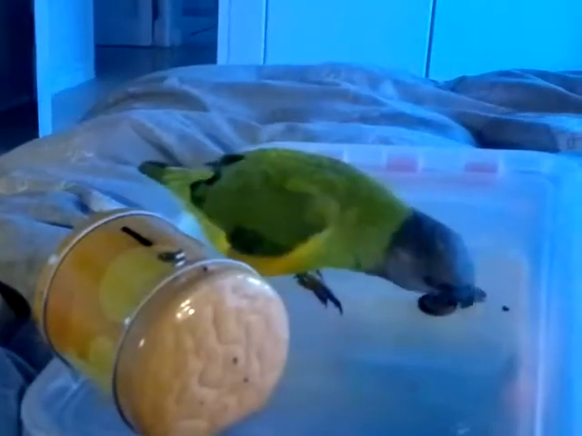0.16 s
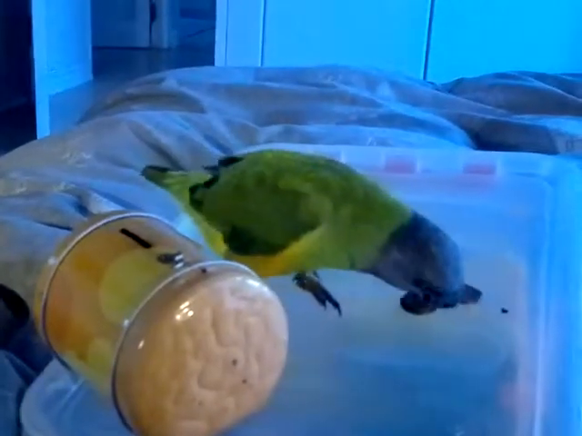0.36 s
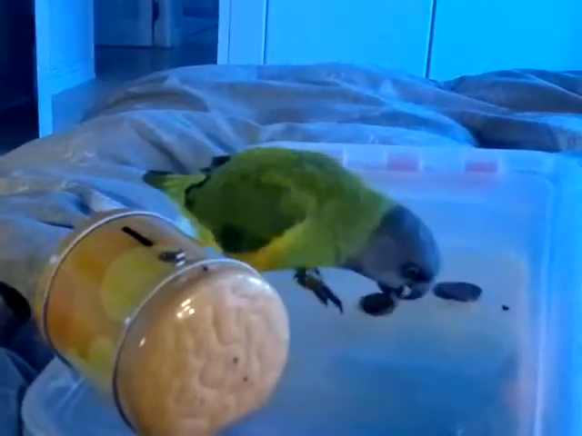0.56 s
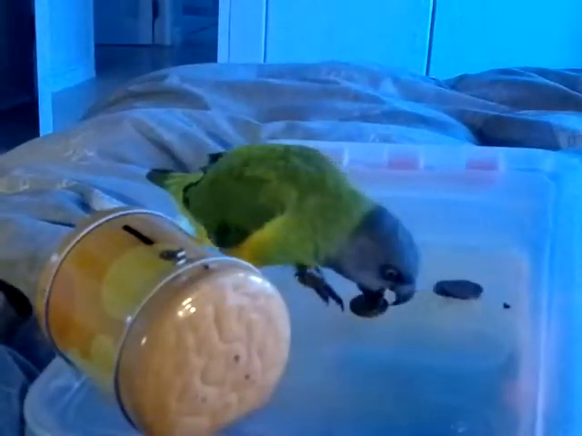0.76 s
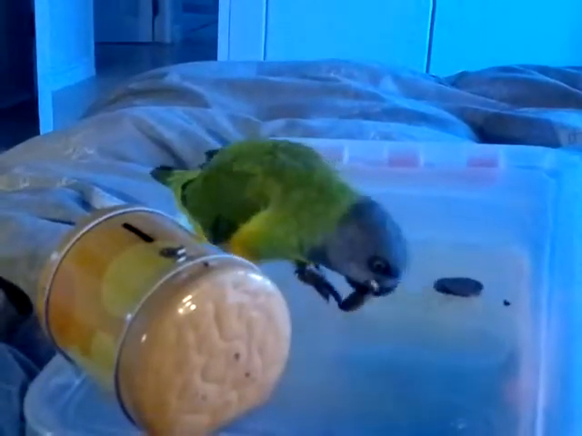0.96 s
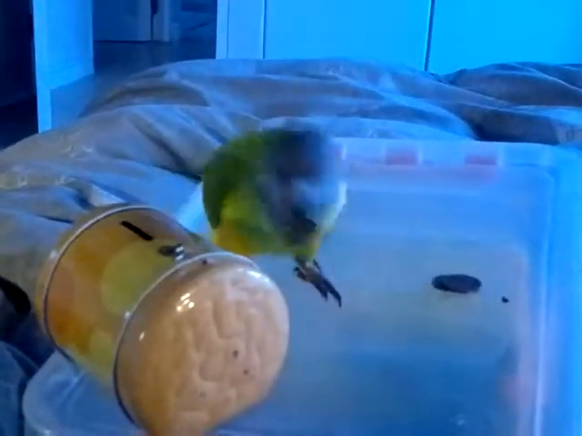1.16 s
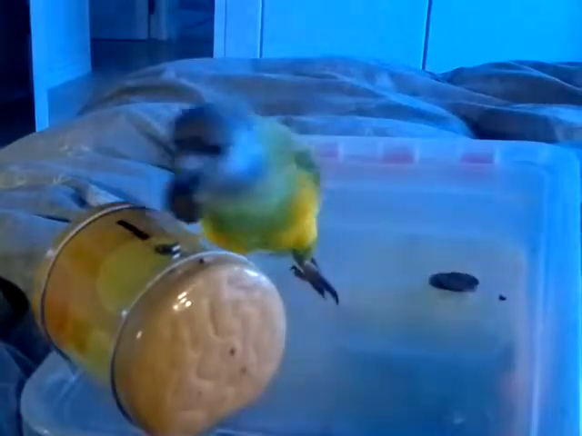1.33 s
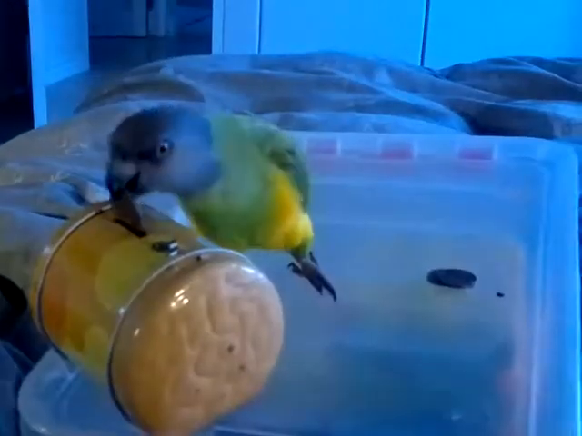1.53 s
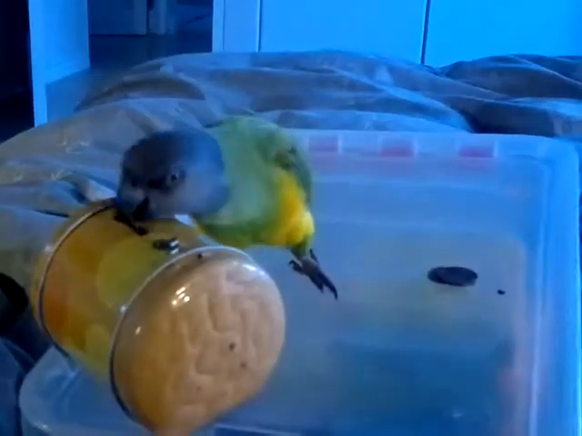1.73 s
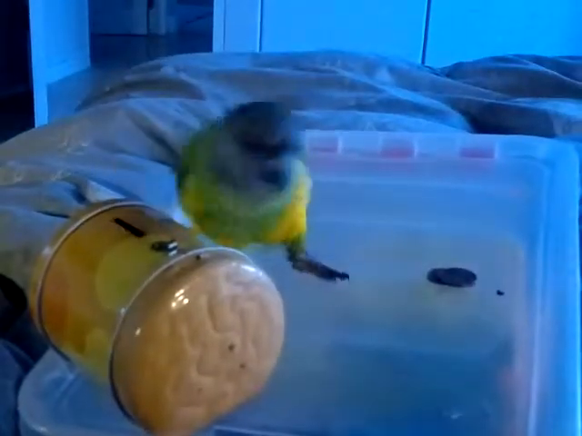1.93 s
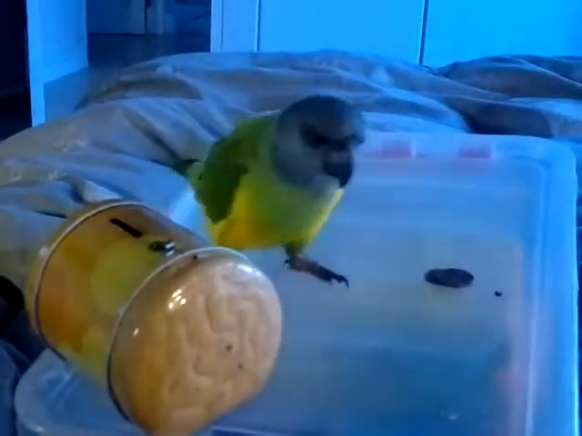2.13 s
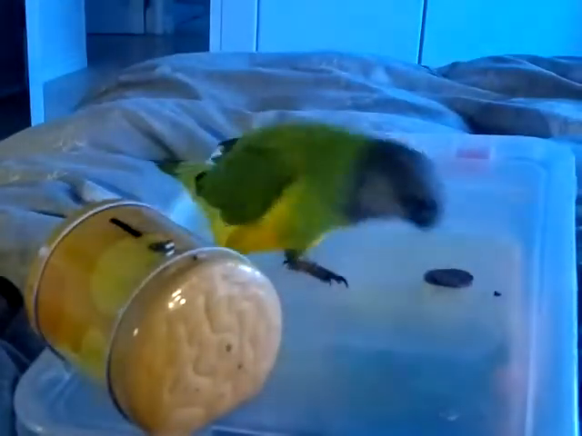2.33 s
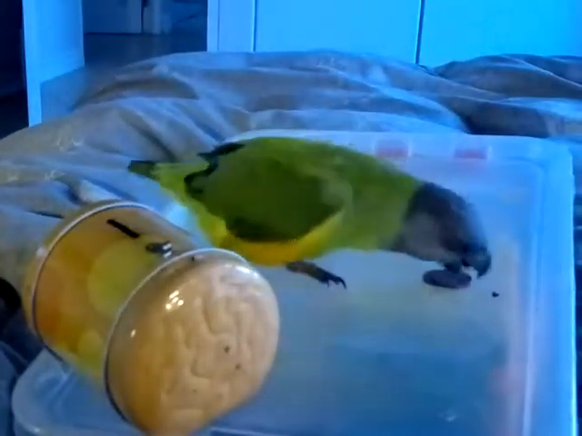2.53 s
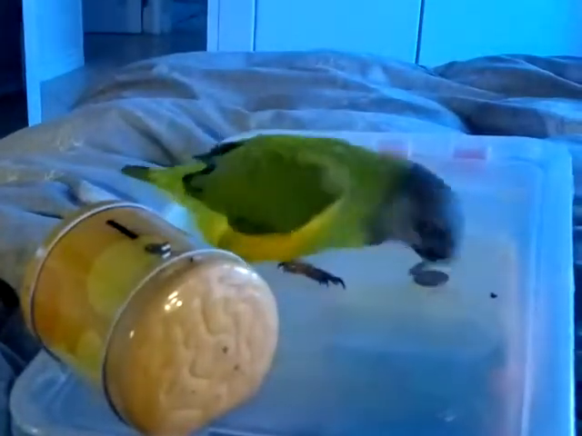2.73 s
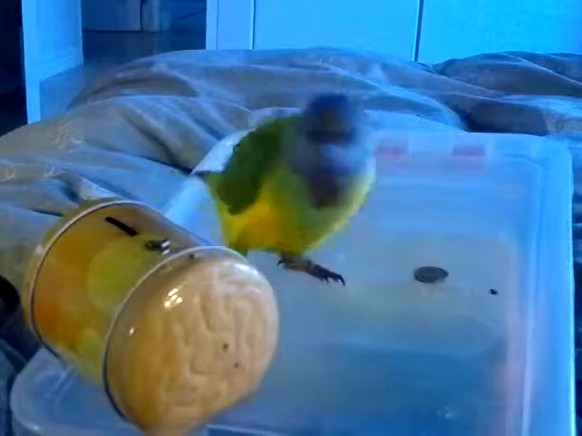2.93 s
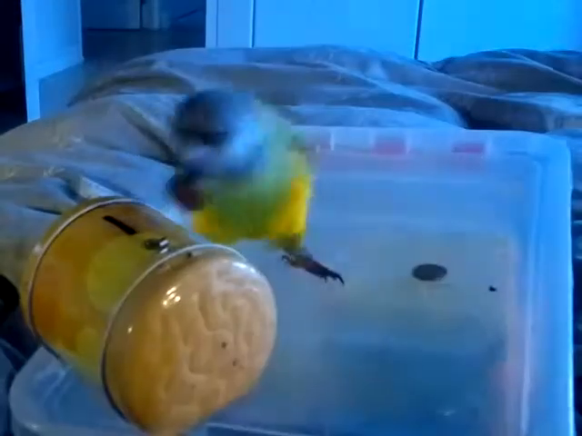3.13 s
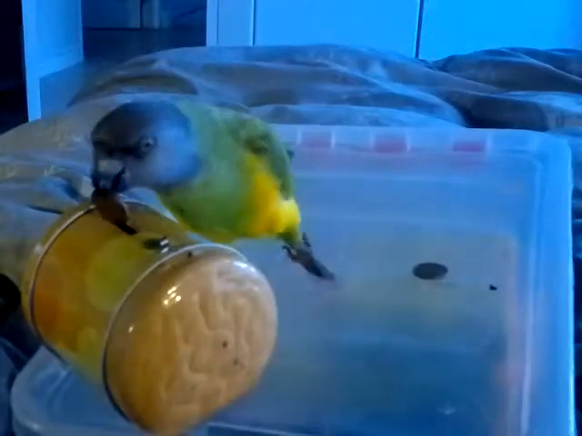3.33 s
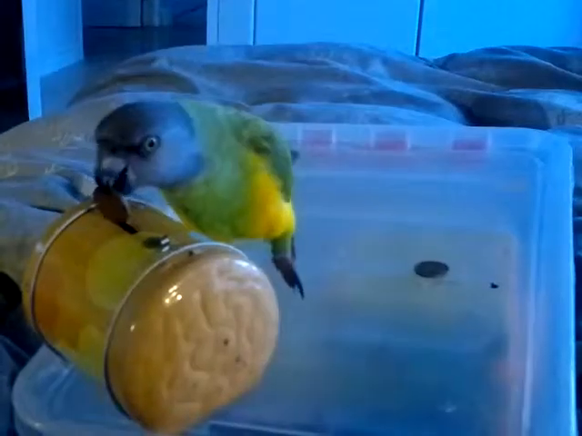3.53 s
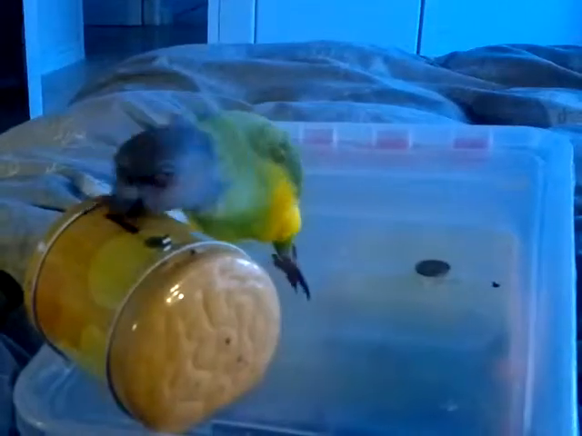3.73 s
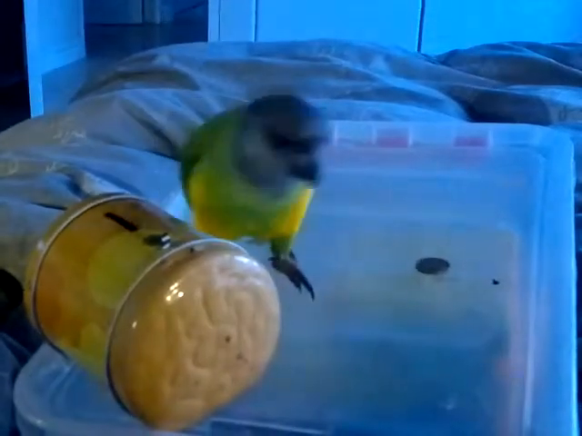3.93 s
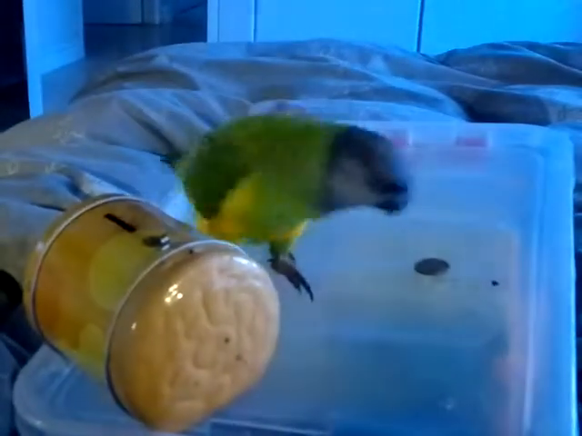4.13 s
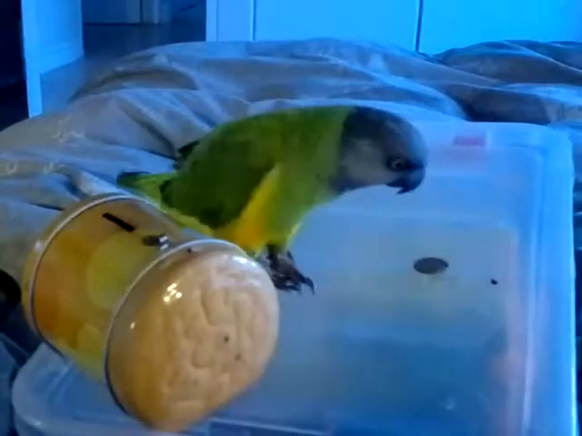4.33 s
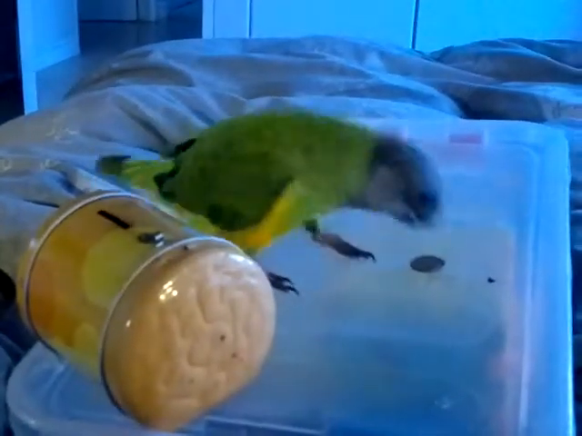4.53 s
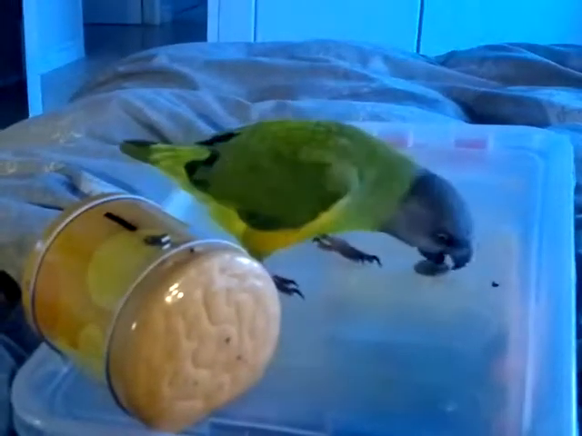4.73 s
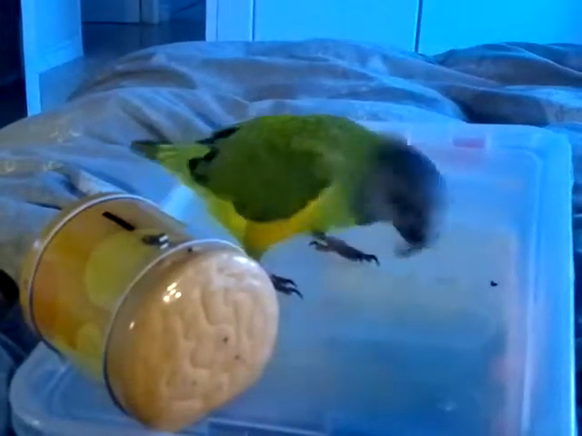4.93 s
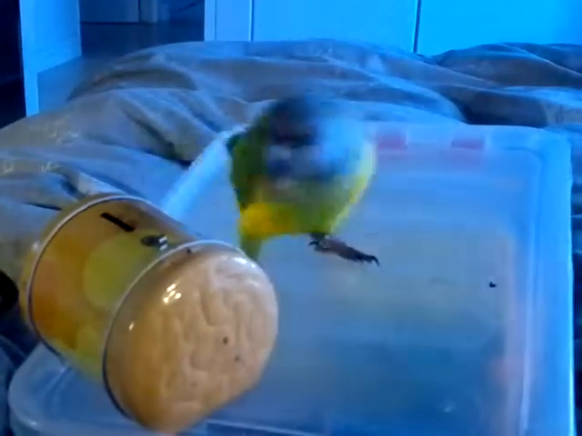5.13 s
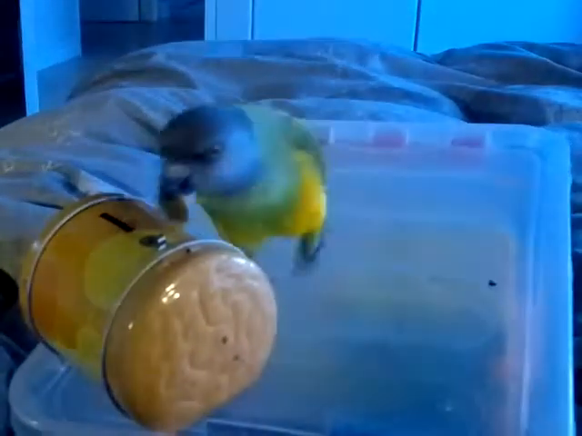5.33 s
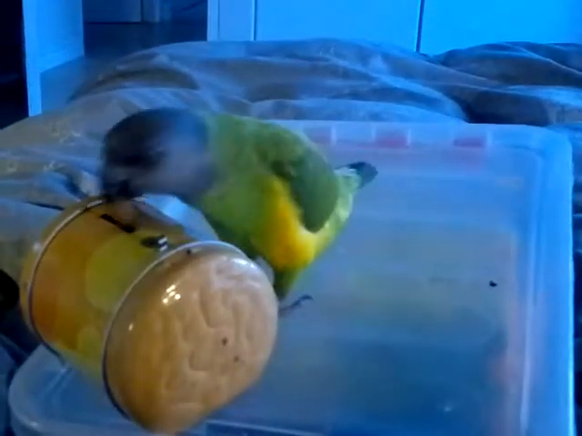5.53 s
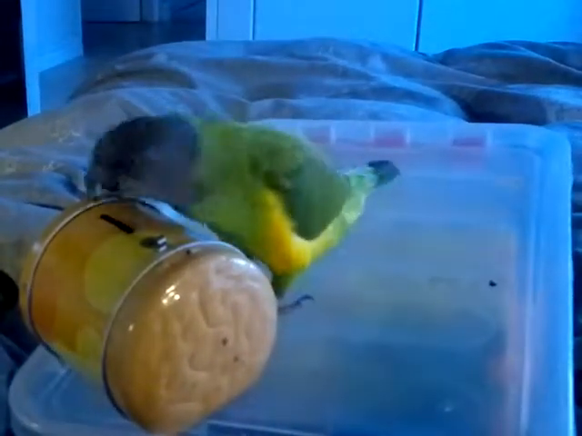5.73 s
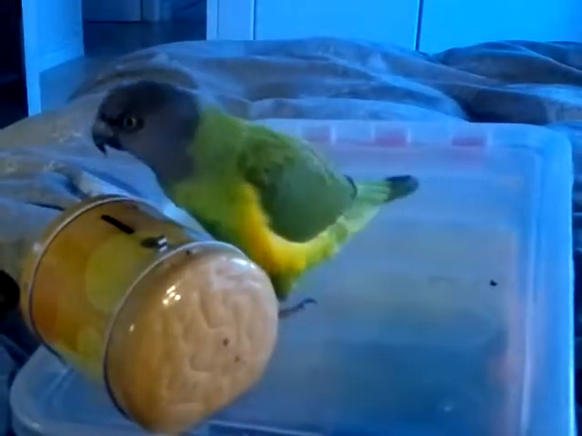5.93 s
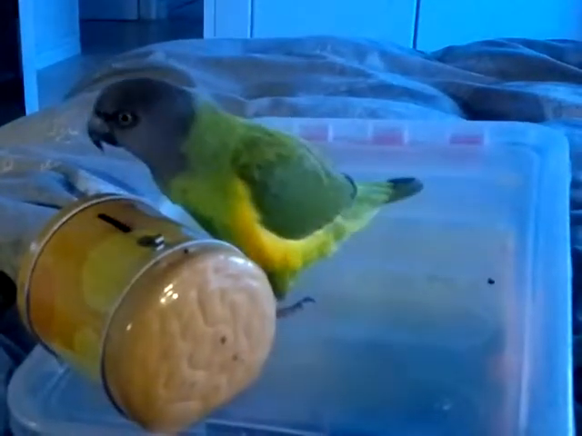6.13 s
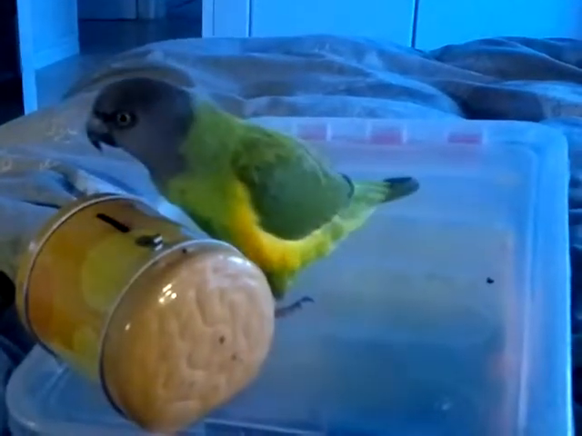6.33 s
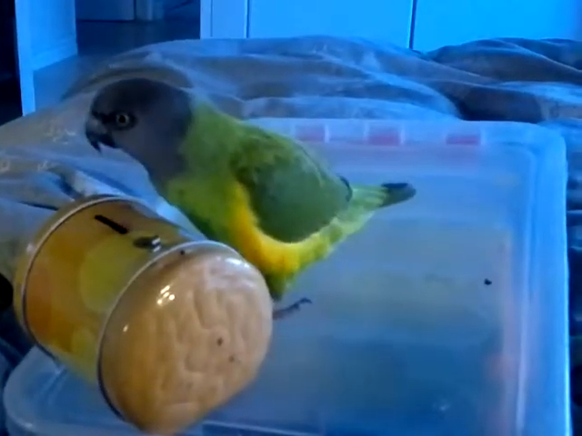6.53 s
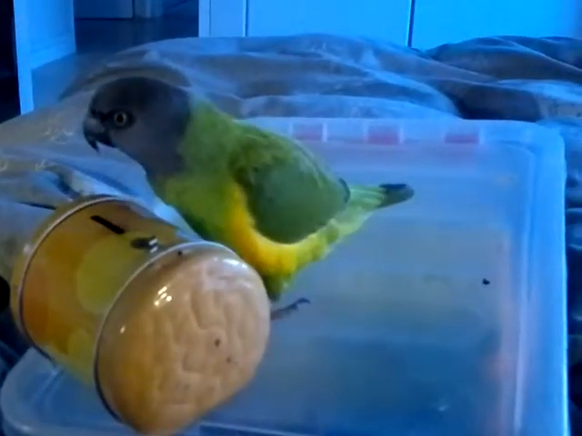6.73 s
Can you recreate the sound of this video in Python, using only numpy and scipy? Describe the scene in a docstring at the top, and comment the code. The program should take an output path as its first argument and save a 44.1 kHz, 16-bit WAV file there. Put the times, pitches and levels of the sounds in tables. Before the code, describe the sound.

Faint room hiss and an uneven low handling rumble, mostly on the left, run throughout. From 0.1 to 0.9 s a parrot's beak, claws and coins tick, thud and briefly slide on a plastic tub lid, strongest near 0.3 s. From 1.3 to 1.65 s a coin scrapes drily on a tin bank's slot; at 1.74 s it drops with a loud, bright clatter and hollow knocks, tumbling among coins until about 1.95 s. Lid taps return around 2.5-2.6 s. Scrapes at 3.1-3.3 and 3.55-3.65 s lead to a second, longer crash from 3.74 to 4.05 s. A soft lid tap comes at 4.65 s, small rubs at 4.75 and 5.35 s, and scrapes at 5.3-5.65 s. The third coin lands at 5.74 s, shorter, with a weaker topple at 5.93-6.02 s. Short, dense small-room reflections follow the hits. Only a tiny scrape near 6.16 s interrupts the closing hiss and rumble.

```python
"""Taps and slides on a plastic tub lid come first, over a faint uneven rumble: a parrot picks coins off the lid.
It posts three of them into a tin bank lying on its side: each scrapes in the slot, falls and tumbles among others.
Noise-like contact forces excite bodies made of a coloured crack and decaying modes; friction drives the slides.
A small furnished room adds dense reflections, and the hand-held camera rumbles, mostly on the left."""
import sys
import numpy as np
from scipy import signal
from scipy.fft import rfft, irfft, next_fast_len
from scipy.io import wavfile

SR = 44100
rng = np.random.default_rng(int(sys.argv[2]) if len(sys.argv) > 2 else 0)


def dump_mix(stems):
    """Bounce the given channels to the path in sys.argv[1] as a 16-bit WAV at rate SR."""
    frames = np.atleast_2d(stems).T  # one column per channel
    limited = np.clip(frames, -1, 1)  # hard clip at full scale
    pcm = np.round(limited * 32767).astype(np.int16)
    wavfile.write(sys.argv[1], SR, pcm)


N = 303408

# room noise spectrum, relative: (frequency [Hz], density [dB per Hz])
HISS_SPECTRUM = [(30, 5), (100, -2.5), (250, -3.5), (450, -16), (1000, -19), (2500, -18.5), (5000, -28.5),
                 (15000, -33)]
# handling rumble spectrum, relative: (frequency [Hz], density [dB per Hz])
RUMBLE_SPECTRUM = [(8, -14), (18, -4), (35, -2), (60, -9), (110, -19), (170, -31.5), (400, -43),
                   (1500, -69)]
# the hand shifts on the camera and the rumble swells: (time of crest [s], rise [dB])
HAND_SHIFTS = [(.15, 11), (0.429, 7), (.65, 8), (1.07, 10), (1.221, 7), (1.62, 9.5), (1.78, 6.5), (2.28, 9),
               (2.48, 6), (2.7, 3), (3.5, 2.5), (3.79, 4), (3.981, 5.5), (4.62, 8.5), (4.919, 8),
               (5.48, 12.5), (5.82, 8.5)]
# side relative to mid at the two microphone ports: (frequency [Hz], level [dB])
SIDE_TO_MID = [(100, -13.5), (850, -10.5), (1150, -7.5), (1500, 1.5), (1950, 6.5), (2600, 6), (3700, -1.5),
               (12000, 2.5)]
# left relative to right, for the tub: (frequency [Hz], level [dB])
TUB_LEFT_TO_RIGHT = [(100, 4), (400, 6.5), (1300, -1), (2400, 2), (4400, 16), (8100, -12), (15000, -13)]
# left relative to right, for the bank: (frequency [Hz], level [dB])
BANK_LEFT_TO_RIGHT = [(100, 3), (400, 1), (700, 2), (1300, -2), (2400, 2), (4400, 1), (8100, -11.5),
                      (15000, -18.5)]
# beak, claws and coins tap the tub lid: (time [s], tick level [dB], thud level [dB])
LID_TAPS = [(0.129, -42, -30.5), (0.202, -38.5, -43), (0.2919, -33, -39), (.306, -23.5, -28),
            (.437, -32.5, -33), (0.5, -37.5, -40.5), (0.627, -48.5, -35), (0.659, -49, -33.5),
            (.78, -49.5, -34), (0.882, -53, -47), (2.507, -40, -32.5), (2.529, -51, -31),
            (2.5588, -34, -44), (2.598, -27, -30), (2.626, -24, -46), (3.41, -54, -60.5), (4.478, -58, -81),
            (4.653, -37.5, -28.5), (4.67, -60, -31), (4.770, -52, -46)]
# coins and claws slide over the lid: (time [s], length [s], level [dB], brightness [dB per octave])
LID_SLIDES = [(.185, 0.047, -48, -5.5), (0.294, .038, -38, 11.5), (0.392, 0.053, -50.5, -9),
              (.435, 0.092, -39.5, -6), (0.752, 0.043, -52, -8), (2.513, 0.041, -46, 4.5),
              (2.593, 0.064, -42.5, 6), (4.747, 0.052, -48.5, -4.5), (5.353, 0.092, -42.5, 4)]
# resonances of the tub lid: (frequency [Hz], level [dB], t60 [s])
LID_MODES = [(132, 2.5, 0.025), (208, -1, 0.12), (230, -8, 0.17), (251, -8, 0.12), (394.6, -8, 0.15),
             (626, -9, 0.095), (1106, -4.5, 0.072)]
# colour of a tick on the lid: (frequency [Hz], level [dB])
TICK_SPECTRUM = [(150, -19), (500, -15), (1100, 10.5), (1500, 5), (2000, 9.5), (2800, 7), (4200, 3),
                 (5500, -17), (8000, -30), (15000, -46)]
# colour of the lid's thud: (frequency [Hz], level [dB])
THUD_SPECTRUM = [(40, 7), (110, 4), (220, 14.5), (400, -5), (700, -7.5), (1200, -1), (3000, -41)]
# a coin, held in the beak, scrapes on the tin and its slot: (time [s], length [s], level [dB])
SLOT_SCRAPES = [(1.297, 0.014, -36.5), (1.313, 0.021, -30), (1.425, 0.043, -30), (1.518, 0.069, -39),
                (1.545, 0.046, -24.5), (1.589, 0.0264, -30), (1.622, 0.043, -28.5), (1.64, 0.03, -22),
                (3.130, 0.011, -36.5), (3.14, 0.026, -31), (3.164, 0.055, -50), (3.224, 0.024, -46),
                (3.2458, .011, -25), (3.307, 0.02, -46), (3.549, 0.084, -28.5), (3.61, 0.0087, -20),
                (3.639, 0.011, -22), (5.24, .019, -56.5), (5.306, 0.0065, -34.5), (5.314, .026, -36.5),
                (5.514, 0.015, -36), (5.523, 0.026, -28.5), (5.607, 0.011, -32.5), (5.623, 0.028, -29),
                (5.645, 0.01, -28.5), (6.16, 0.0067, -47)]
# a coin lands in the bank, or topples there once more, and tumbles until it settles:
# (time [s], length [s], level of its small clinks at first [dB])
COIN_DROPS = [(1.744, .235, -10.5), (3.745, 0.35, -13), (5.746, .105, -10), (5.938, 0.04, -17)]
# hard hits of each tumble; a coin that lands flat knocks the body more:
# (time [s], tin wall level [dB], hollow body level [dB])
HARD_HITS = [(1.743, -5, -24), (1.757, -4, -6.5), (1.77, -12.5, -18), (1.787, -8.5, -28.5),
             (1.795, -8.5, -22), (1.813, -4.5, -17), (1.8232, 0, -6), (1.861, -9.5, -13), (1.907, -8, -18),
             (1.948, -22.5, -23), (3.7406, -10.5, -15.5), (3.757, -6.5, -13.5), (3.772, -11, -13.5),
             (3.8084, -2.5, -10.5), (3.829, -1.5, -13), (3.872, -7, -12.5), (3.903, -5.5, -18),
             (3.922, -18.5, -24.5), (3.9507, -9.5, -23.5), (4.014, -2.5, -15.5), (4.0489, -10.5, -25),
             (5.7412, -9.5, -15), (5.759, -7, -11.5), (5.783, -12, -25.5), (5.794, -9, -21.5),
             (5.812, -3, -12.5), (5.8441, -8, -17.5), (5.9329, -6.5, -22.5), (5.970, -16, -38.5),
             (6.0239, -25, -38.5)]
# resonances of the tin wall with the coins in it: (frequency [Hz], level [dB], t60 [s])
WALL_MODES = [(1950, -6, .05), (2465, -6, .07), (2735, -5, .07), (3003, 0, .12), (3158, -5, .07),
              (3276, -3, .08), (3585, -1, .07), (3702, 0, .07), (3816, -3, .06), (4166, -7, .06),
              (4383, -2, .07), (5180, -11, .06), (5680, -11, .06)]
# resonances of the air and end caps of the bank: (frequency [Hz], level [dB], t60 [s])
HOLLOW_MODES = [(255, -13, .07), (413, -9, .08), (548, -9, .05), (667, 0, .06), (735, -1, .05),
                (945, -8, .04), (1075, -9, .04), (1200, -5, .06)]
# colour of the first crack of the tin wall: (frequency [Hz], level [dB])
WALL_SPECTRUM = [(300, -43.5), (800, -17), (1150, -6.5), (1500, -4.5), (2100, 1), (3600, 4.5), (4500, -1.5),
                 (6000, -6), (8500, -15.5), (12000, -21), (16000, -25)]
# colour of the first knock of the hollow body: (frequency [Hz], level [dB])
HOLLOW_SPECTRUM = [(40, -19.5), (100, -7), (220, -5.5), (330, -8), (450, -5.5), (700, -1.5), (860, -2),
                   (1150, 2.5), (1600, -16.5), (4000, -53)]
# colour of a coin's edge on the slot: (frequency [Hz], level [dB])
EDGE_SPECTRUM = [(300, -35), (800, -23.5), (1150, -2.5), (1500, -11), (2100, 1), (3600, 3.5), (4600, 1),
                 (6000, -7.5), (8500, -19), (12000, -22), (16000, -29.5)]

RING = int(.2 * SR)  # length of one contact sound [samples]
T = np.arange(RING) / SR  # time within one contact sound [s]
BLOW_S = .003  # span over which the level of a hit is reckoned
TOP_HZ = 16200
HISS_DB = -64.5
RUMBLE_DB, RUMBLE_RIGHT_DB = -47, -26  # rumble before its swells; right relative to left
# the grip on the camera tightens and eases at random, up to the swing either way
GRIP_CHANGES_PER_S, GRIP_SWING_DB = 24, 1.5
NUDGE_S = .075  # the rise in dB falls to 1/e of its crest this long before and after
REBOUND_S, REBOUND_DB = .016, -10.5  # each tap rebounds once, after about this delay
SCRAPE_HOLLOW_DB = -20.5  # hollow body relative to coin edge in a scrape
DRAG_S, DRAG_DB = .035, -15.5  # a lighter drag outlasts the firm scrape by this time
CLINKS_PER_S, SETTLE_DB_PER_S, CLINK_SCATTER_DB = 72, 35, 2.5  # clink rate is approximate
CLINK_HOLLOW_DB = -13  # hollow body relative to tin wall in a small clink


def amp(db):
    """Logarithmic level: decibels become an amplitude ratio."""
    return 10 ** (np.asarray(db) / 20)


def fade(t, t60):
    """Exponential decay: the envelope is 60 dB down at t60."""
    return np.exp(-np.log(1000) * t / t60)


def unit(x):
    """Energy normalization: each channel's squares sum to one."""
    return x / np.sqrt(np.sum(x ** 2, axis=-1, keepdims=True))


def gains(points, size):
    """Spectral interpolation: (Hz, dB) points, joined on a log-frequency axis, give a gain per bin."""
    point_hz, point_db = np.transpose(points)
    bin_hz = np.fft.rfftfreq(size, 1 / SR)
    return amp(np.interp(np.log(bin_hz + 1), np.log(point_hz), point_db))


def colour(x, points):
    """Minimum-phase filtering: a folded cepstrum gives a causal response with the given spectrum."""
    size = 8192
    cepstrum = irfft(np.log(gains(points, size)))
    cepstrum[1:size // 2] *= 2
    cepstrum[size // 2 + 1:] = 0
    response = irfft(np.exp(rfft(cepstrum)))
    return signal.fftconvolve(x, response[None], axes=1)[:, :x.shape[1]]


def body(spectrum, modes, ring_db, detune, bright_db=0, vary_db=2):
    """Modal superposition: a crack, then modes, both varied at random from contact to contact."""
    points = np.array(spectrum, float)
    tilt_db = bright_db * np.log2(points[:, 0])  # bright_db is in dB per octave
    points[:, 1] += tilt_db + vary_db * rng.standard_normal(len(points))
    crack = colour(signal.unit_impulse(RING)[None], points)
    hz, db, t60 = np.transpose(modes)[:, :, None]
    shift, weight, phase = rng.standard_normal((3, len(modes), 1))
    waves = np.sin(2 * np.pi * (hz * (1 + detune * shift) * T + phase))
    rings = waves * fade(T, t60) / np.sqrt(t60)  # equal energy whatever the decay
    ring = np.sum(amp(db + vary_db * weight) * rings, axis=0)
    onset = 1 - fade(T, .01)
    return unit(crack) + amp(ring_db) * unit(ring * onset)


def blow(rise_s, contact_s, chatter_s, chatter_db):
    """Impact force: a brief flurry of contacts, with a longer-lasting chatter on the surface."""
    contact, chatter = rng.standard_normal((2, 2, RING)) * (1 - fade(T, rise_s))
    flurry = unit(contact * fade(T, contact_s))
    return flurry + amp(chatter_db) * unit(chatter * fade(T, chatter_s))


def stroke(length_s, slips_hz, uneven_db):
    """Stick-slip friction: fine noise catches and slips under a pressure that swells and lets go."""
    grip_db = uneven_db * np.interp(T * slips_hz, np.arange(RING), rng.standard_normal(RING))
    pressure = np.sin(np.pi * np.clip(T / length_s, 0, 1))
    return pressure * amp(grip_db) * rng.standard_normal((2, RING))


def add(out, s, force, response, db, length_s=BLOW_S):
    """Linear excitation: force convolved with response sounds at s; db spreads its energy over length_s."""
    sound = unit(signal.fftconvolve(force, response, axes=1)[:, :RING])
    sound = sound * amp(db) * np.sqrt(length_s * SR)
    start = max(int(s * SR), 0)
    out[:, start:start + RING] += sound[:, :N - start]


def room(x, wet_db, low_t60, high_t60, build_s):
    """Diffuse reverberation: dense reflections off near walls and furniture; the treble dies first."""
    t = np.arange(2 * RING) / SR
    noise = rng.standard_normal((2, len(t)))
    lowpass = signal.butter(2, 4500, fs=SR, output="sos")
    low = signal.sosfiltfilt(lowpass, noise)
    high = noise - low
    tail = (low * fade(t, low_t60) + high * fade(t, high_t60)) * (1 - fade(t, build_s))
    return x + amp(wet_db) * signal.fftconvolve(x, unit(tail), axes=1)[:, :N]


def ports(x, pan):
    """Mid-side coherence: two unrelated channels become left and right, alike in bass, apart in treble."""
    size = next_fast_len(N)
    mid, side = rfft(x, size)
    width, lean = gains(SIDE_TO_MID, size), gains(pan, size)
    pair = np.array([(mid + width * side) * lean, mid - width * side])
    keep_power = np.sqrt(2 / (1 + width ** 2) / (1 + lean ** 2))
    return irfft(pair * keep_power, size)[:, :N]


def background():
    """Stationary and modulated noise: even room hiss, and hand rumble that swells, mostly in the left port."""
    t = np.arange(N) / SR
    hiss = unit(colour(rng.standard_normal((2, N)), HISS_SPECTRUM)) * amp(HISS_DB)
    wander = rng.uniform(-1, 1, N)
    grip_db = GRIP_SWING_DB * np.interp(t * GRIP_CHANGES_PER_S, np.arange(N), wander)
    nudge_db = sum(db * np.exp(-((t - s) / NUDGE_S) ** 2) for s, db in HAND_SHIFTS)
    rumble = unit(colour(rng.standard_normal((2, N)), RUMBLE_SPECTRUM))
    rumble = rumble * amp(RUMBLE_DB + grip_db + nudge_db) * amp([[0], [RUMBLE_RIGHT_DB]])
    # unit energy times sqrt(N) is unit RMS
    return np.sqrt(N) * (ports(hiss, [(100, 2), (2000, .5)]) + rumble)


def rebound(force):
    """Inelastic bounce: a force is followed by its weaker repeat."""
    lag = int(REBOUND_S * rng.uniform(.6, 1.4) * SR)
    repeat = np.pad(force, ((0, 0), (lag, 0)))[:, :RING]
    return force + amp(REBOUND_DB) * repeat


def tub():
    """Impact and friction on a plate: hard contacts tick on plastic, the wide lid thuds, slides rub."""
    out = np.zeros((2, N))
    for s, tick_db, thud_db in LID_TAPS:
        tick = body(TICK_SPECTRUM, LID_MODES, ring_db=-11, detune=.03)
        thud = body(THUD_SPECTRUM, LID_MODES, ring_db=-6, detune=.03, vary_db=1.5)
        tick_force = blow(rise_s=.00081, contact_s=.0067, chatter_s=.019, chatter_db=0)
        thud_force = blow(rise_s=.0007, contact_s=.017, chatter_s=.08, chatter_db=-9)
        add(out, s, rebound(tick_force), tick, tick_db)
        add(out, s, rebound(thud_force), thud, thud_db)
    for s, length_s, db, bright_db in LID_SLIDES:
        lid = body(TICK_SPECTRUM, LID_MODES, ring_db=-13, detune=.03, bright_db=bright_db)
        add(out, s, stroke(length_s, slips_hz=598.6, uneven_db=4.5), lid, db, length_s)
    wet = room(out, wet_db=-10.0, low_t60=.18, high_t60=.075, build_s=.019)
    return ports(wet, TUB_LEFT_TO_RIGHT)


def scrape(length_s):
    """Sliding friction of the coin in the slot: a firm stroke over a lighter, longer drag."""
    firm = stroke(length_s, slips_hz=447, uneven_db=3.0)
    drag = stroke(length_s + DRAG_S, slips_hz=300, uneven_db=7)
    return firm + amp(DRAG_DB) * drag


def clinks():
    """Energy loss in tumbling: unevenly spaced small contacts weaken; rows (s, wall dB, hollow dB)."""
    rows = []
    for s, length_s, db in COIN_DROPS:
        gap, wall, hollow = rng.standard_normal((64, 3)).T
        age = np.cumsum(np.exp(.3 * gap)) / CLINKS_PER_S
        level_db = db - SETTLE_DB_PER_S * age
        wall_db = level_db + CLINK_SCATTER_DB * wall
        hollow_db = level_db + CLINK_HOLLOW_DB + CLINK_SCATTER_DB * hollow
        contacts = np.column_stack([s + age, wall_db, hollow_db])
        rows += list(contacts[age < length_s])
    return rows


def bank():
    """Impact and friction on resonators: coins scrape and tumble; the tin wall clinks, the hollow body knocks."""
    out = np.zeros((2, N))
    for s, length_s, db in SLOT_SCRAPES:
        bright_db = rng.uniform(-1, 1)
        edge = body(EDGE_SPECTRUM, WALL_MODES, ring_db=-10, detune=.004, bright_db=bright_db, vary_db=2.5)
        hollow = body(HOLLOW_SPECTRUM, HOLLOW_MODES, ring_db=-19.5, detune=.028)
        force = scrape(length_s)
        add(out, s, force, edge, db, length_s)
        add(out, s, force, hollow, db + SCRAPE_HOLLOW_DB, length_s)
    for s, wall_db, hollow_db in list(HARD_HITS) + clinks():
        bright_db = rng.uniform(-1.3, 1.6)  # brightness varies at random from hit to hit [dB per octave]
        # the heap of coins damps the wall, so the crack outweighs the ring
        wall = body(WALL_SPECTRUM, WALL_MODES, ring_db=-8, detune=.002, bright_db=bright_db, vary_db=2)
        hollow = body(HOLLOW_SPECTRUM, HOLLOW_MODES, ring_db=-6, detune=.008, vary_db=1)
        wall_force = blow(rise_s=.009, contact_s=.02, chatter_s=.125, chatter_db=-2)
        hollow_force = blow(rise_s=.0015, contact_s=.012, chatter_s=.085, chatter_db=-3)
        add(out, s, wall_force, wall, wall_db)
        add(out, s, hollow_force, hollow, hollow_db)
    wet = room(out, wet_db=-7.0, low_t60=.19, high_t60=.16, build_s=.012)
    return ports(wet, BANK_LEFT_TO_RIGHT)


def scene():
    """Superposition: background, tub and bank add linearly."""
    return background() + tub() + bank()


def record(dry):
    """Peak limiting and low-pass filtering: gain drops at full scale, recovers slowly; the top is cut."""
    over_db = 20 * np.log10(np.maximum(np.abs(dry).max(axis=0), 1))
    release_db_per_s = 12
    release = release_db_per_s * np.arange(N) / SR
    held_db = np.maximum.accumulate(over_db + release) - release
    lowpass = signal.ellip(12, .2, 90, TOP_HZ, fs=SR, output="sos")
    return signal.sosfilt(lowpass, dry * amp(-held_db))


dry = scene()
out = record(dry)
dump_mix(out)
```